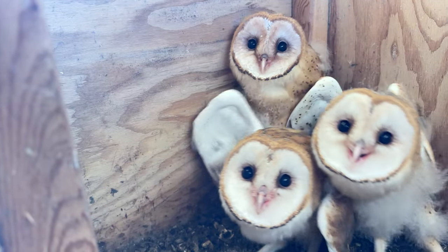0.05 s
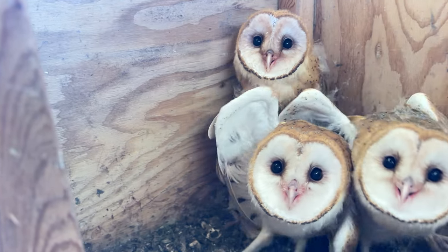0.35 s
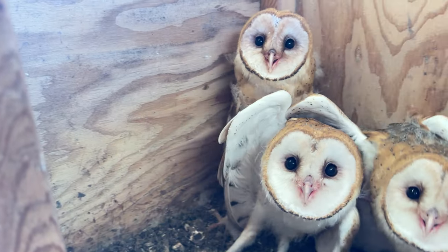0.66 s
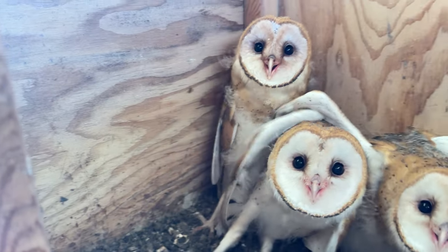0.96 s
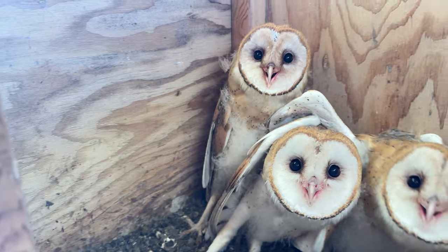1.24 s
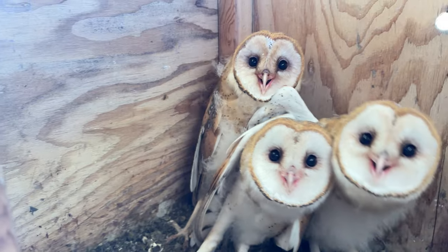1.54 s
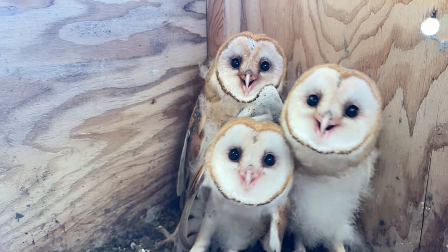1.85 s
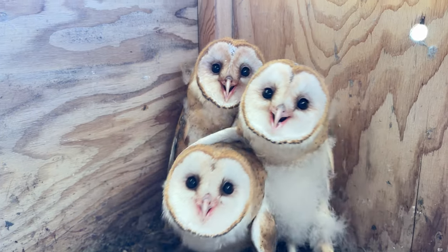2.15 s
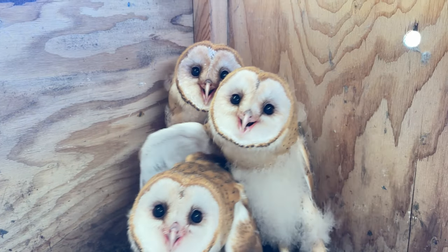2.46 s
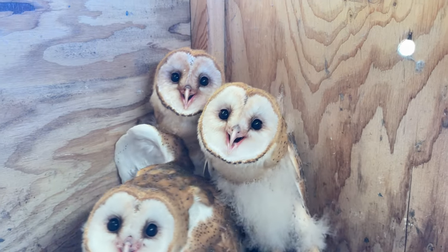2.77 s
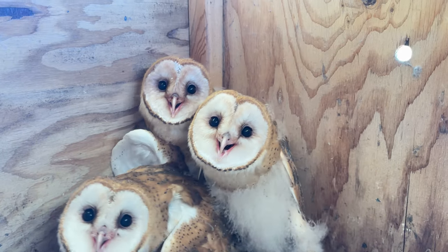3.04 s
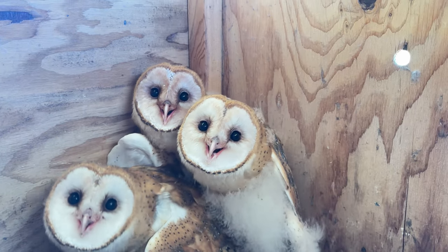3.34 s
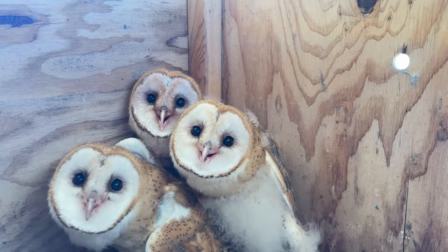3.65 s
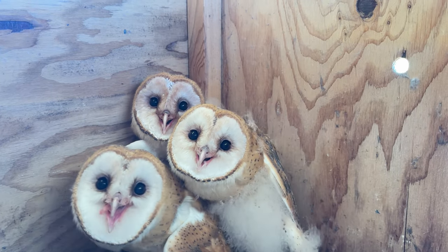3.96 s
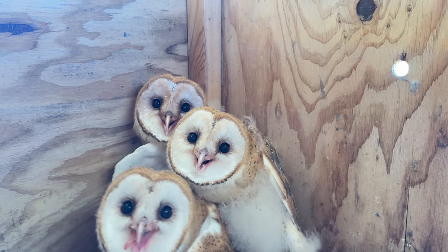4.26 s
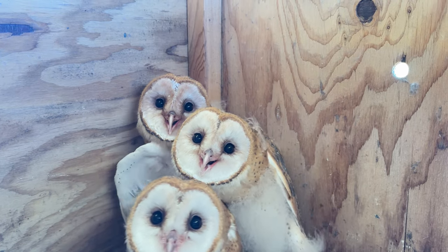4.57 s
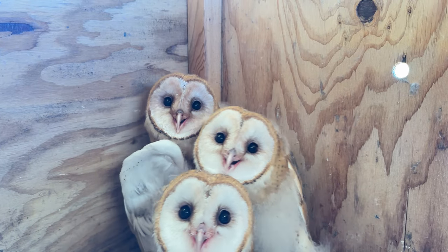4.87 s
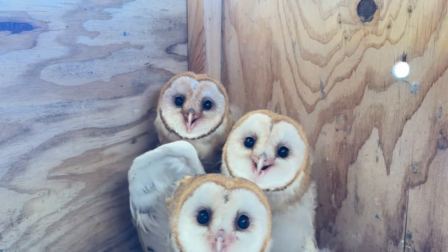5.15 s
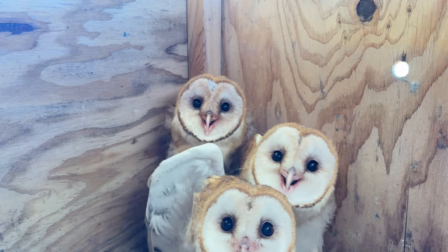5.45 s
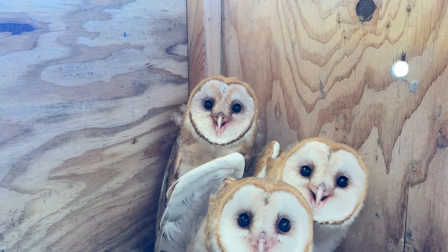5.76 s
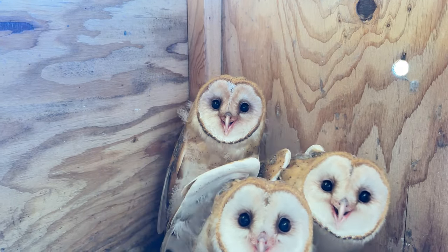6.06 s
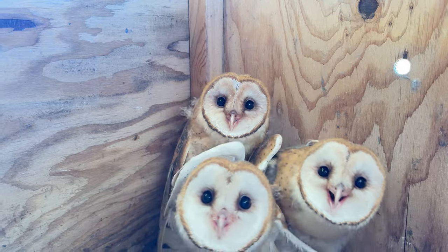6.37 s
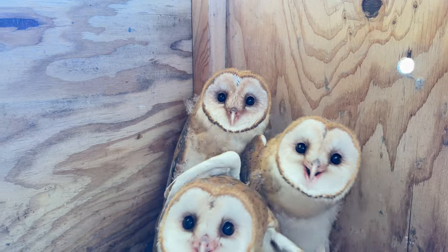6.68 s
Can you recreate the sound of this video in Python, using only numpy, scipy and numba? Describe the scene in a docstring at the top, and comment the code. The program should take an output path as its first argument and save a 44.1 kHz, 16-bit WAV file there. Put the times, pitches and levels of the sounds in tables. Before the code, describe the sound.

Young owls hiss loudly and raspily without pause inside a wooden box, with two sharp bill snaps and faint low bumps.

```python
"""Young barn owls hissing in a nest box.

Three owls hiss at an intruder: air rushes through throat and bill resonances that slide as they sway.
One holds a fluttering, nearly whistled hiss, then drops back. A bill snaps twice; feet shuffle and
knock on the plywood floor. A close microphone pair hears it all inside the box."""
import sys
import numpy as np
from scipy import signal
from scipy.fft import rfft, irfft, next_fast_len
from scipy.io import wavfile
from scipy.ndimage import uniform_filter1d
from numba import njit

SR = 44100
rng = np.random.default_rng(int(sys.argv[2]) if len(sys.argv) > 2 else 0)


def dump_mix(stems):
    """Bounce the given channels to the path in sys.argv[1] as a 16-bit WAV at rate SR."""
    frames = np.atleast_2d(stems).T  # one column per channel
    limited = np.clip(frames, -1, 1)  # hard clip at full scale
    pcm = np.round(limited * 32767).astype(np.int16)
    wavfile.write(sys.argv[1], SR, pcm)


N = 295911
TIME_S = np.arange(N) / SR


def from_db(db):
    """Decibels to gain."""
    return 10 ** (np.asarray(db) / 20)


def unit_rms(x):
    """Scale to rms 1."""
    return x / np.sqrt(np.mean(x ** 2) + 1e-20)


def in_time(rows):
    """Interpolate (time_s, values...) rows at every sample."""
    time_s, *columns = np.transpose(rows)
    return [np.interp(TIME_S, time_s, column) for column in columns]


def at_hz(rows, hz):
    """Interpolate (freq_hz, value) rows on a log-frequency axis."""
    freq_hz, values = np.transpose(rows)
    return np.interp(np.log(hz + 1), np.log(freq_hz), values)


def high_pass(x, edge_hz):
    """Small surfaces radiate little below an edge."""
    return signal.sosfilt(signal.butter(3, edge_hz, "high", fs=SR, output="sos"), x)


@njit
def sliding_band(x, centre_rad, width_rad):
    """Unity-gain band-pass; centre and width in radians per sample."""
    y = np.zeros(len(x))
    for i in range(len(x)):
        a = width_rad[i] / 2
        drive = a * (x[i] - (x[i - 2] if i > 1 else 0.))
        y[i] = (drive + 2 * np.cos(centre_rad[i]) * y[i - 1] - (1 - a) * y[i - 2]) / (1 + a)
    return y


def resonate(x, hz, width_hz):
    """One resonance, steady or sliding."""
    rad_per_hz = np.full(N, 2 * np.pi / SR)
    return sliding_band(x, rad_per_hz * hz, rad_per_hz * width_hz)


def rush(hz, width_hz):
    """Turbulence passed twice through a resonance; rms 1."""
    band = resonate(rng.standard_normal(N), hz, width_hz)
    return unit_rms(resonate(band, hz, width_hz))


def cavity(modes, stretch=1):
    """Turbulence in resonances that slide together; rms 1."""
    return unit_rms(sum(from_db(db) * rush(hz * stretch, width_hz) for hz, width_hz, db in modes))


def flutter(hz, width_hz, depth_db):
    """Uneven pulsing, as a gain."""
    return unit_rms(from_db(depth_db * rush(hz, width_hz)))


def evened(x, share):
    """Saturating air stream: flatten a share of its chance swells; rms 1."""
    power = uniform_filter1d(x ** 2, size=SR // 100)
    return unit_rms(x / power ** (share / 2))


def ring(blows, modes):
    """Blows set damped sines ringing."""
    out = np.zeros(N)
    for hz, db, t60_s in modes:
        radius, angle = from_db(-60 / (t60_s * SR)), 2 * np.pi * hz / SR
        feedback = [1, -2 * radius * np.cos(angle), radius ** 2]
        out += from_db(db) * signal.lfilter([0, np.sin(angle)], feedback, blows + 1e-18)
    return out


def box_air():
    """Low murmur of air in the box's resonances."""
    # centre_hz, width_hz, gain_db
    air_modes = [(72, 50, -7.5), (170, 160, -13), (335, 130, -9), (460, 150, 0), (565, 130, -1.5),
                 (830, 150, -13), (1060, 400, -9)]
    return from_db(-45.5) * cavity(air_modes)


def stroke(start_s, length_s, attack_s=.021, release_s=.018):
    """Envelope of one rubbing movement: rise, hold, exponential fade."""
    rise = np.clip(1 + (TIME_S - start_s) / attack_s, 0, 1)
    return rise * np.exp(-np.maximum(TIME_S - start_s - length_s, 0) / release_s)


def shuffle():
    """Feet and wings rub the floor: dull scuffs over faint fidgeting."""
    # start_s, length_s, level_db
    scuffs = [(0.239, .12, -39.5), (.42, .56, -50), (1.272, 0.093, -37), (1.5, 0.044, -44.5),
              (1.635, 0.067, -27), (1.76, .065, -24), (1.89, 0.064, -30.5), (2.002, 0.054, -43),
              (2.291, 0.043, -41), (3.015, .1, -35.5), (3.18, 0.14, -44.5), (3.358, .03, -43),
              (3.605, 0.06, -37), (4.467, 0.29, -47), (5.072, 0.034, -41), (5.17, .025, -48),
              (5.45, 0.17, -50), (5.796, 0.025, -45), (6.002, .035, -40), (6.43, 0.055, -41.5),
              (6.565, 0.024, -40)]
    # centre_hz, width_hz, gain_db
    rub_modes = [(66.7, 46, 11), (129, 124, 0), (232, 210, -8)]
    rubbing = sum(from_db(db) * stroke(start_s, length_s) for start_s, length_s, db in scuffs)
    fidgeting = from_db(-59.5) * flutter(7.3, 14.6, depth_db=2)
    return np.hypot(rubbing, fidgeting) * evened(cavity(rub_modes), share=.28)


def footfalls():
    """Steps ring the plywood floor; a harder step is a shorter push."""
    # start_s, level_db, hardness_hz
    steps = [(0.248, -38, 199), (1.645, -27, 119), (1.67, -27, 264), (1.765, -27, 220), (1.807, -25, 200),
             (1.923, -37, 220), (2.299, -30, 700), (3.026, -23.5, 454), (3.051, -30, 600),
             (3.628, -32.5, 263), (3.87, -37.5, 500)]
    # pitch_hz, gain_db, t60_s
    floor_modes = [(71, -26, .13), (111, -2, 0.044), (155, 7, 0.017), (225, 2, 0.029), (338, 4, 0.04),
                   (440, 1, 0.057)]
    pushes = np.zeros(N)
    for start_s, db, hardness_hz in steps:
        start, decay = round(start_s * SR), np.exp(-2 * np.pi * hardness_hz / SR)
        push = (1 - decay) * decay ** np.arange(SR // 20)
        pushes[start:start + len(push)] += from_db(db) * push
    return from_db(-2) * ring(pushes, floor_modes)


def bill_snaps(echo_s=.0034):
    """The mandibles meet twice per snap; the near wall throws the clack back."""
    # start_s, level_db, low_edge_hz
    contacts = [(3.7108, -16.5, 620), (3.7133, -8, 520), (4.5636, -9, 1050), (4.5656, -2.5, 1050)]
    # bill and surrounding air: pitch_hz, gain_db, t60_s
    clack_modes = [(830, -19.5, .038), (1060, -16.5, .022), (1340, -14, .027), (1600, -5, .005),
                   (2400, -7, .005), (3100, -9, .004), (4500, -12, .004), (6600, -19, .003)]
    clicks, blow = np.zeros(N), signal.unit_impulse(SR // 20)
    for start_s, db, edge_hz in contacts:
        start = round(start_s * SR)
        clicks[start:start + len(blow)] += from_db(db) * high_pass(blow, edge_hz)
    clack = ring(clicks, clack_modes)
    return from_db(-.5) * clack + from_db(-11) * np.interp(TIME_S - echo_s, TIME_S, clack)


def bill_whistles():
    """Thin whistles at the bill swell and fade as they glide."""
    # start_s, length_s, peak_db, start_hz, end_hz
    glides = [(-.07, 0.73, -29, 7600, 9150), (.9, .6, -36, 8750, 8850), (1.25, 0.7, -24.5, 8850, 9200),
              (1.7, 1.1, -38, 9050, 8650), (2.605, 1.44, -31, 9350, 9900), (3.593, 1.3, -35, 9800, 9500),
              (4.95, .62, -37, 10050, 9900), (5.35, 1.25, -37, 9250, 7950)]
    out = np.zeros(N)
    for start_s, length_s, db, start_hz, end_hz in glides:
        progress = np.clip((TIME_S - start_s) / length_s, 0, 1)
        arch = (4 * progress * (1 - progress)) ** 1.2
        out += from_db(db) * arch * rush(start_hz + (end_hz - start_hz) * progress, width_hz=490)
    return out


def wall_notch(x):
    """A wall reflection cancels one band, which slides as the birds sway."""
    # time_s, notch_hz, depth (0-1)
    sway = [(0, 7000, 0), (.6, 8000, 0.47), (2.1, 7970, 0.4), (2.9, 7900, .9), (3.25, 7850, .8),
            (3.5, 6570, .9), (4.55, 6580, 1), (4.8, 7100, 0.1), (5.25, 7900, 1), (5.9, 7830, 0.8),
            (6.4, 8000, 0.06)]
    notch_hz, depth = in_time(sway)
    for _ in range(2):
        x = x - depth * resonate(x, notch_hz, width_hz=650)
    return x


def brood_hiss():
    """Breath through throat, mouth and bill: a broad rasp around a shrill core."""
    # time_s, effort_db, core_hz
    effort = [(0, -37.5, 5560), (.15, -35, 5520), (.3, -34, 5920), (.5, -30.3, 5960), (.9, -32, 5990),
              (1.25, -27, 6100), (1.7, -29.5, 6085), (2.25, -29.5, 5976), (3.05, -32.5, 5980),
              (3.6, -38, 5800), (4.3, -37.5, 5774), (4.85, -39.5, 5870), (5.25, -36, 6060),
              (5.5, -36.5, 6090), (5.65, -37, 5820), (6.08, -35.8, 5950), (6.35, -30.7, 6260),
              (6.71, -29, 6260)]
    # an open gape widens the core: time_s, width_hz
    gape = [(0, 920), (.5, 1030), (1.25, 1240), (2.1, 704), (3.7, 560), (5.45, 740), (5.65, 1264),
            (6.71, 1280)]
    # time_s, level_db
    throat_levels = [(0, -36.5), (.3, -33), (.85, -34.5), (1.9, -31), (2.9, -34), (3.5, -39), (4.05, -42.5),
                     (4.95, -40), (5.35, -34.5), (6.15, -37.5), (6.71, -30.5)]
    bill_levels = [(0, -37), (.5, -29.5), (1.45, -31), (1.85, -36), (2.8, -33.5), (3.4, -40), (4.1, -46),
                   (4.75, -39.5), (5.25, -32), (5.53, -34.5), (5.63, -41.5), (6.05, -35.5), (6.71, -39.5)]
    # centre_hz, width_hz, gain_db
    throat_modes = [(1549, 290, -1), (1673, 314, -1), (1923, 590, -1.5), (2438, 380, -3.5),
                    (2860, 910, -2.5)]
    mouth_modes = [(3830, 1700, -4), (4373, 760, -1.2), (4804, 450, -2.3), (5340, 520, -3),
                   (7460, 1500, -7), (8020, 230, 0.5)]
    bill_modes = [(9740, 1700, 4.5), (10020, 350, 2), (10800, 360, 1.2), (11560, 330, 1.5)]
    fizz_modes = [(7760, 1000, -4), (12530, 840, -1.5), (14300, 1300, -2), (15500, 550, -4)]
    gape_modes = [(2435, 660, 1), (3010, 220, -5), (13350, 790, -0.5)]
    effort_db, core_hz = in_time(effort)
    width_hz, = in_time(gape)
    throat_db, = in_time(throat_levels)
    bill_db, = in_time(bill_levels)
    stretch = (core_hz / np.mean(core_hz)) ** .52  # the airway shortens as the core rises
    breath = from_db(throat_db) * cavity(throat_modes, stretch)
    breath += from_db(effort_db + 2.12) * cavity(mouth_modes, stretch)
    breath += from_db(bill_db) * cavity(bill_modes, stretch)
    breath += from_db(.46 * effort_db - 21.5) * cavity(fizz_modes, stretch)
    breath += from_db(effort_db - 3.5) * (width_hz / np.max(width_hz)) ** 2.8 * cavity(gape_modes)
    # two birds share the core, which weakens as it widens
    lower_bird = rush(core_hz - .13 * width_hz, .35 * width_hz)
    upper_bird = from_db(.5) * rush(core_hz + .31 * width_hz, .66 * width_hz)
    core_db = effort_db + 15 - .0086 * width_hz
    breath += from_db(core_db) * unit_rms(lower_bird + upper_bird) * flutter(160, 160, depth_db=-1.1)
    return breath * flutter(49, 110, depth_db=.22)


def leader_hiss():
    """A narrow throat resonance, pulsed by fluttering tissue; drops abruptly near 5.6 s."""
    # time_s, level_db, throat_hz
    long_hiss = [(.15, -40.5, 2490), (.6, -31.3, 2750), (.98, -32.5, 2770), (1.28, -27.5, 2900),
                 (1.62, -35.5, 2860), (2.25, -30.5, 2807), (3.1, -29, 2775), (3.85, -35.5, 2706),
                 (4.7, -32, 2774), (5.25, -30.5, 2864), (5.55, -32, 2860)]
    # centre_hz, width_hz, gain_db
    chest_modes = [(840, 120, -8.5), (1000, 220, -13), (1272, 100, -.5)]
    level_db, throat_hz = in_time(long_hiss)
    envelope, = in_time([(.1, .55), (.2, .88), (5.56, .63), (5.585, .27)])
    beat_hz = 72 * (1 + .23 * rush(15, 33))
    pulsing = unit_rms(from_db(.99 * np.sin(2 * np.pi * np.cumsum(beat_hz) / SR)))
    # the throat tightens
    width_hz, = in_time([(.15, 300), (1.3, 320), (1.7, 200), (3.8, 190), (4.7, 160)])
    tone = from_db(level_db) * evened(rush(throat_hz, width_hz), share=.35)
    chest = from_db(.41 * level_db - 28.5) * cavity(chest_modes)
    return envelope * (tone + chest) * pulsing


def box_reflections(x, t60_s=.07, left_db=-11, right_db=-15):
    """Dense echoes between close walls, different at each microphone."""
    delay_s = TIME_S[:SR // 6]
    echoes = rng.standard_normal((2, len(delay_s))) * from_db(-60 * delay_s / t60_s) * (delay_s > .002)
    echoes /= np.sqrt(np.sum(echoes ** 2, axis=1, keepdims=True))
    return from_db([[left_db], [right_db]]) * signal.fftconvolve(x[None], echoes, axes=1)[:, :N]


def microphones(direct, reflected):
    """The right port faces the birds; above 8.3 kHz the two differ only in phase."""
    # freq_hz, left_minus_right_db
    balance = [(220, -.5), (550, -9), (730, -6), (1280, -16), (1750, -20), (2300, -10), (2850, -12),
               (4000, -9.5), (5400, -13), (6200, -12), (7200, -5), (7900, -7), (8300, 0)]
    # freq_hz, left_lead_rad
    phase = [(150, -.3), (500, -1.1), (1200, .6), (2200, .1), (2800, -1.3), (4200, -.5), (5850, -1.5),
             (7700, .4), (8050, 2.6), (8700, 3.1), (9250, 3.2), (11000, 6.2), (11700, 6.4), (13100, 9.3),
             (13800, 9.5), (15200, 12.5)]
    size = next_fast_len(N + SR // 10)
    hz = np.arange(size // 2 + 1) * SR / size
    ratio = from_db(at_hz(balance, hz))
    left = ratio * np.exp(1j * at_hz(phase, hz))
    ports = np.array([left, np.ones(len(hz))]) * np.sqrt(2 / (1 + ratio ** 2))
    # box echoes fade out between 7.6 and 8.3 kHz, leaving the highest hiss dry
    echo_gain = 1 - np.clip((hz - 7600) / 700, 0, 1)
    walls = echo_gain * rfft(reflected, size)
    return irfft(ports * rfft(direct, size) + walls, size)[:, :N]


def scene():
    """Owls, feet and box air, direct and reflected, in stereo."""
    owls = wall_notch(brood_hiss()) + bill_whistles() + leader_hiss() + bill_snaps()
    feet = high_pass(footfalls() + shuffle(), edge_hz=34)
    air = box_air()
    diffuse_air = from_db(2.5) * high_pass(air, edge_hz=320)  # above the bass it comes from all walls
    direct = from_db(-.98) * owls + air + feet
    reflected = box_reflections(owls + diffuse_air + from_db(3) * feet)
    return microphones(direct, reflected)


def record(dry, cutoff_hz=15850):
    """Steep low-pass."""
    return signal.sosfilt(signal.ellip(12, .1, 90, cutoff_hz, fs=SR, output="sos"), dry)


dry = scene()
out = record(dry)
dump_mix(out)
```